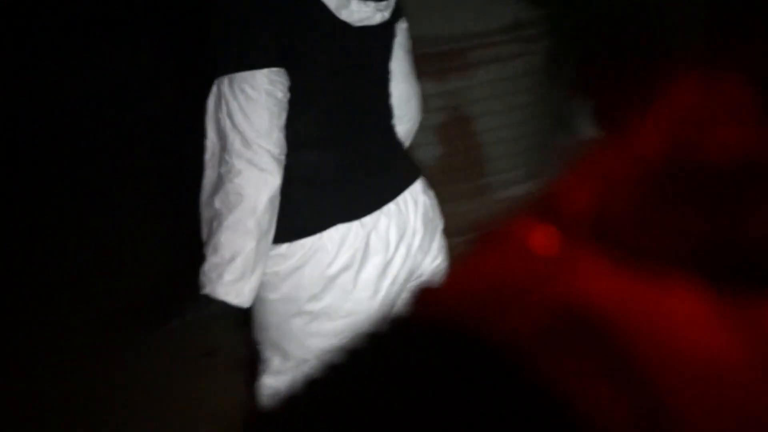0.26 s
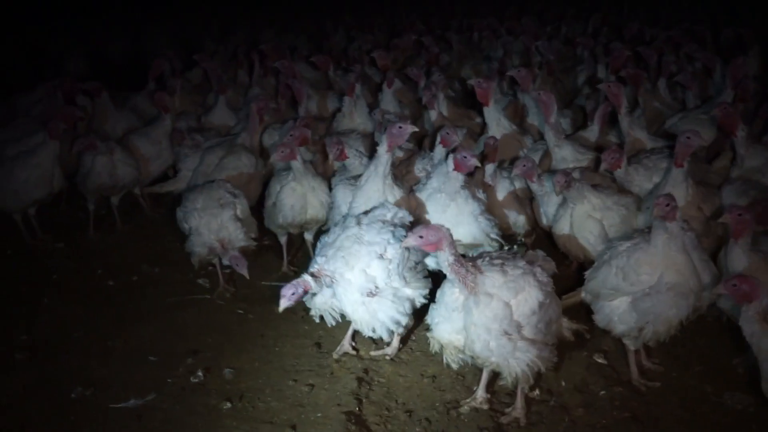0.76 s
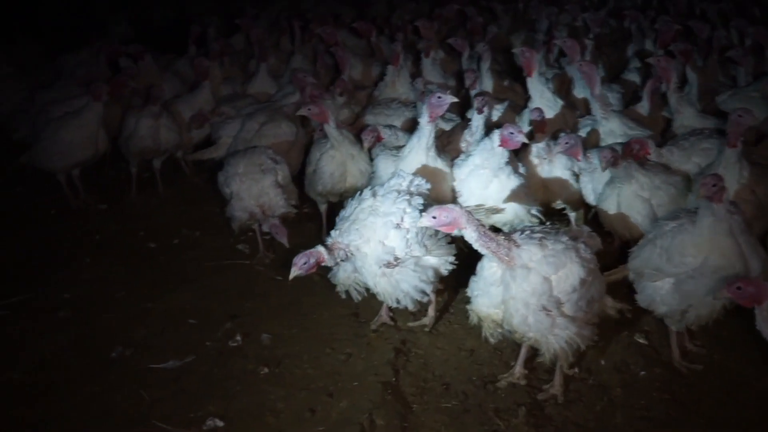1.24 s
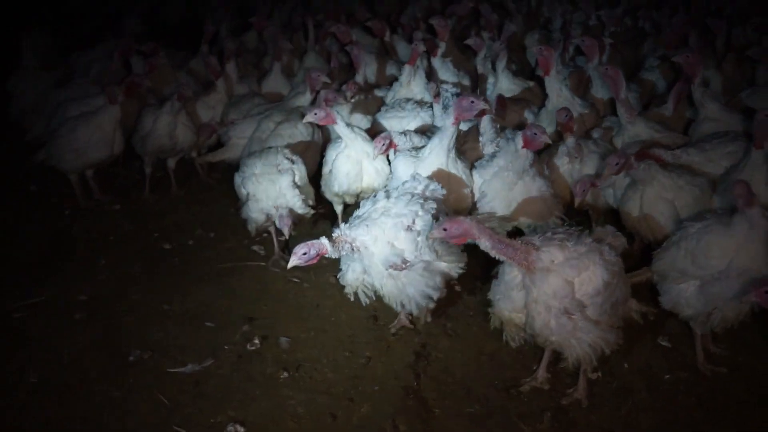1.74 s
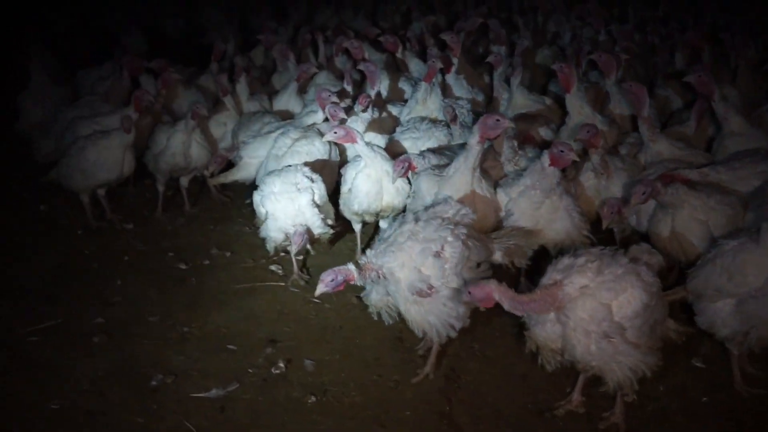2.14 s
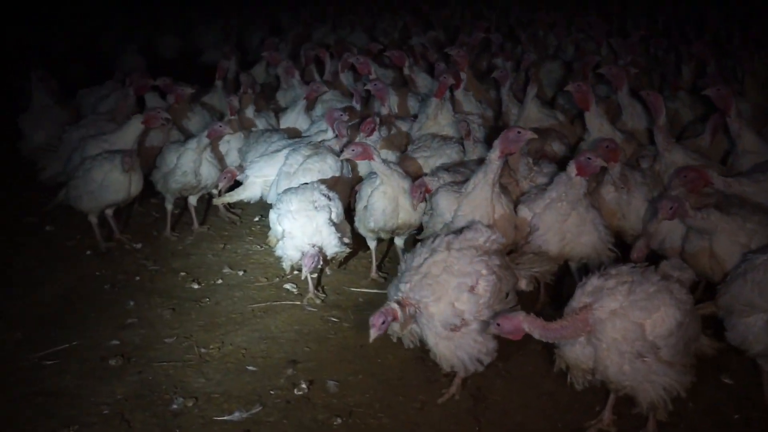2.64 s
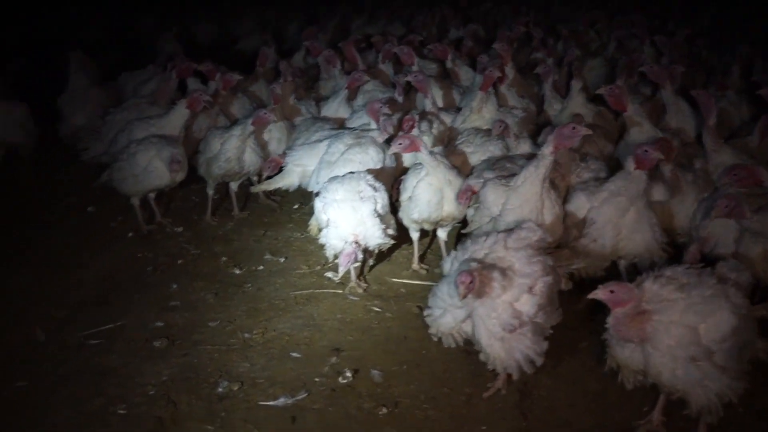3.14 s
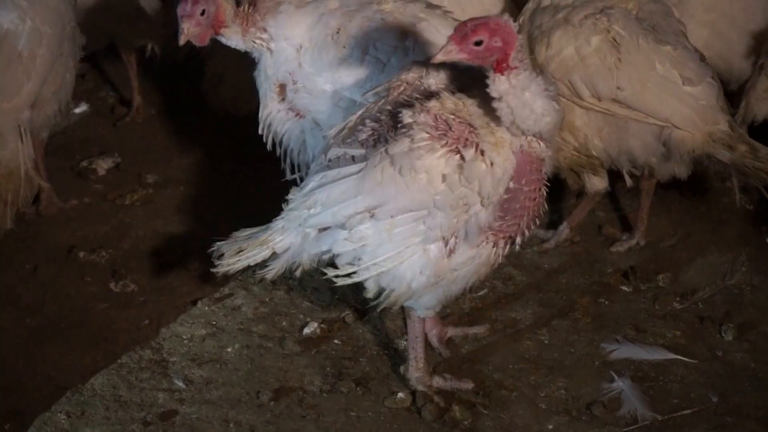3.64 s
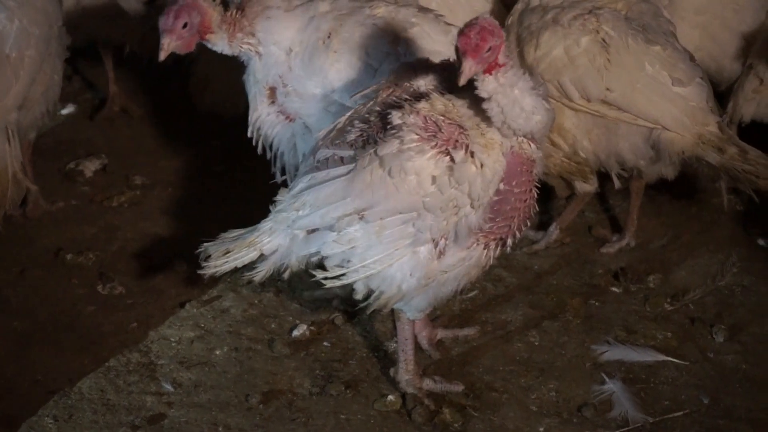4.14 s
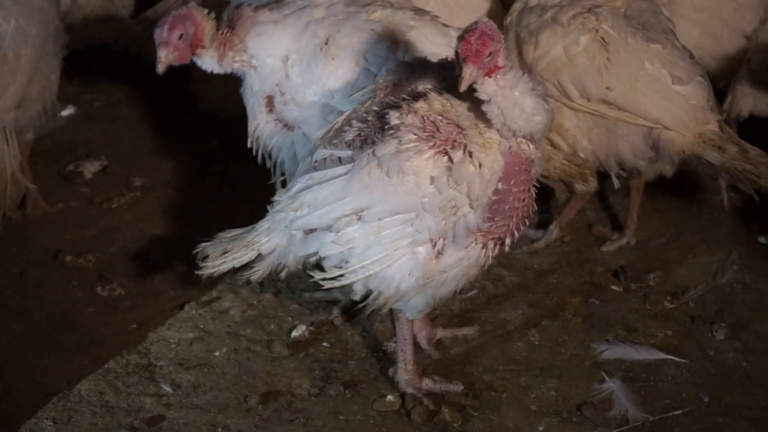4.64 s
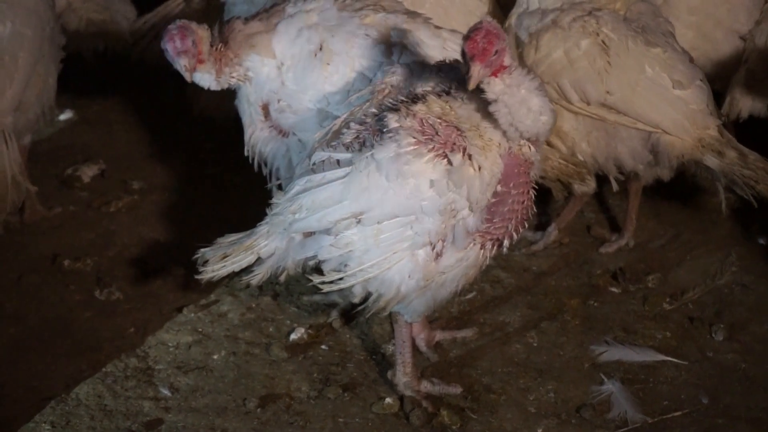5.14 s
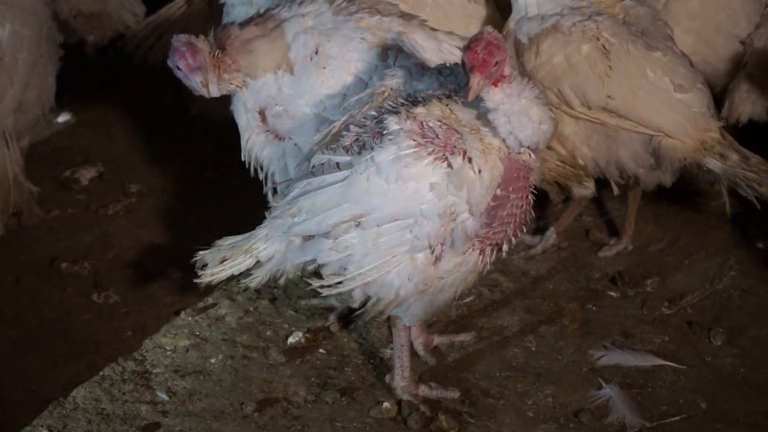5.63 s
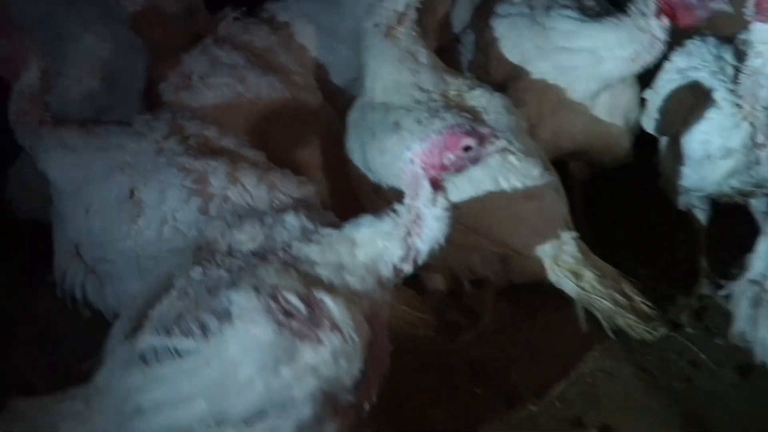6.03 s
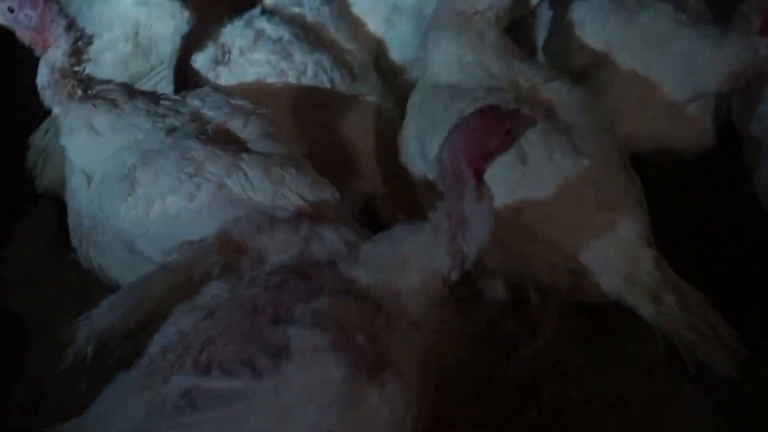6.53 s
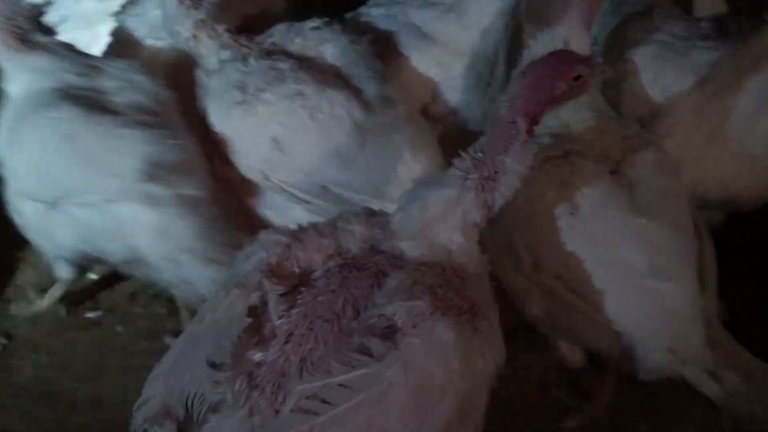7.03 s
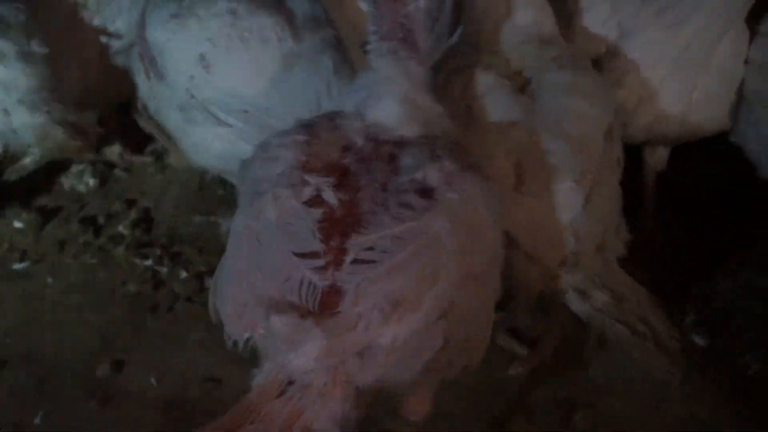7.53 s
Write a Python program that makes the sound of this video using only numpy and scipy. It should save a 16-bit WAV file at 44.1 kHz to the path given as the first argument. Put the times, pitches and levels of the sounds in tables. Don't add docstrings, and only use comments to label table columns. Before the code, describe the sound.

Cloth rubs quietly against a handheld microphone outdoors, with one sharp, dull knock. Half a second in, it cuts abruptly to a large ringing barn packed with turkeys. Close birds give very short, hoarse rising putts and yelps on both sides, mostly right, over a blurred distant chorus. Feathers and litter rustle, claws tick, and a low fan hum sinks under loud calls. The flock surges and thins without stopping.

```python
import sys
import numpy as np
from scipy import signal
from scipy.fft import rfft, irfft, next_fast_len
from scipy.io import wavfile
from scipy.ndimage import uniform_filter1d

SR = 44100
rng = np.random.default_rng(int(sys.argv[2]) if len(sys.argv) > 2 else 0)


def makeup_ratio(level_db):
    decades = np.asarray(level_db, float) / 20
    return 10 ** decades


def log_audio(samples):
    frames = np.atleast_2d(samples).T
    limited = np.clip(frames, -1, 1)
    pcm = np.round(limited * 32767).astype(np.int16)
    wavfile.write(sys.argv[1], SR, pcm)


N = 343098
CUT_S = 0.5
EDGE_HZ = 15850


# centre in Hz, width in Hz, lift or dip in dB.
THROAT = [(3557, 390, 12.5), (4430, 2060, -9), (5740, 560, 14.5), (8300, 240, -1)]


def call(start_hz, end_hz, length, dull_db, flick, rough, mouth=()):
    t = np.arange(0, length, 1 / SR)
    closing = flick * np.exp(-max(dull_db, 0) / 9) * np.exp((t - length) / 0.003)
    hz = start_hz * (end_hz / start_hz) ** (t / length) * (1 + closing)
    breath = rng.standard_normal((2, max(2800, len(t))))
    slow_breath = uniform_filter1d(uniform_filter1d(breath, size=40), size=30)
    wobble, rasp = 1.2 * slow_breath[:, :len(t)]
    turns = np.cumsum(hz * (1 + rough * wobble)) / SR

    k = np.arange(1, 11)[:, None]
    resonances = THROAT + list(mouth)
    lift_db = sum(db / (1 + (2 * (k * hz - f) / width) ** 2) for f, width, db in resonances)
    level = makeup_ratio(-dull_db * np.log2(k) - 3.58 * (k - 1.5) + lift_db) * (k * hz < EDGE_HZ)
    level *= np.minimum(t / (0.0025 + 0.0002 * k ** 2), 1) ** 1.5
    level *= 1 + 13 * rough * np.sqrt(k - 0.9) * rasp
    voice = (level * np.sin(2 * np.pi * k * turns)).sum(0)
    snap = 0.08 * closing * breath[1, :len(t)]
    return (voice + snap) * np.minimum((length - t) / 0.00044, 1)


def add(mix, s, sound, pan_db):
    part = mix[:, round(s * SR):][:, :len(sound)]
    part += makeup_ratio(np.array([[0.5], [-0.5]]) * pan_db) * sound[:part.shape[1]]


# start in seconds, peak in dB,
# start pitch in Hz, end pitch in Hz, dullness in dB per octave.
GLIDES = [(0.61, -18, 791, 987, 7.5), (0.832, -13.5, 858, 1260, 17), (4.47, -18.5, 1420, 1300, 11),
          (.555, -24.5, 1106, 1470, 14), (1.149, -19, 1498, 1896, 19), (1.078, -13, 1340, 1584, 12),
          (3.183, -17, 1358, 1753, 13.5), (1.108, -19, 1330, 1300, 18), (2.468, -19, 1183, 1425, 12),
          (2.622, -17, 978, 1170, 9), (7.385, -15.5, 1007, 1350, 7.5), (7.653, -24, 1244, 1530, 17),
          (7.527, -21.5, 1526, 1930, 14), (1.588, -19.5, 757, 793, 3.5), (1.136, -15, 1118, 1300, 12),
          (1.454, -15, 978, 847, 13), (1.585, -15, 886, 1288, 11), (1.921, -14.5, 1005, 1440, 14),
          (2.138, -13.5, 960, 1376, 11.5), (2.531, -20.5, 952, 686, 8), (3.078, -18.5, 1069, 1210, 8),
          (3.094, -17.5, 1500, 2064, 18), (3.159, -15.5, 1156, 1710, 8.5), (3.328, -18.5, 920, 1404, 7.5),
          (3.967, -26, 825, 1000, 24), (4.02, -14.5, 1027, 1370, 16), (4.141, -17, 792, 701, 2.5),
          (4.438, -13, 1108, 1310, 4), (5.063, -20.5, 802, 1784, 9.5), (6.076, -13.5, 1030, 1300, 10),
          (6.737, -13, 878, 1100, 8.5), (7.04, -13.5, 1144, 1525, 28.5), (7.063, -15.5, 867, 1140, 4.5),
          (7.103, -22.5, 738, 953, 0.5), (7.319, -21.5, 915, 1170, 5.5)]
# start in seconds, peak in dB, start pitch in Hz,
# dullness in dB per octave.
PUTTS_RIGHT = [(0.691, -22, 1206, 5), (0.876, -20.5, 990, 6), (1.502, -12.5, 950, 9.5),
               (1.75, -18, 1066, 9), (2.59, -21, 946, 13), (3.743, -18, 948, 9.5), (4.511, -20.5, 837, 10),
               (4.814, -24.5, 1043, 6), (5.811, -11.5, 902, 13), (5.966, -19, 1300, 11),
               (6.17, -16, 952, 2.5), (6.194, -14, 1356, 16), (6.704, -11, 1077, 12),
               (6.787, -16, 1452, 16), (7.52, -16, 1075, 6.5), (7.6, -18.5, 988, 27), (7.721, -16, 1188, 6)]
# start in seconds, peak in dB, start pitch in Hz, dullness in dB per octave.
PUTTS_LEFT = [(0.503, -16.5, 883, 20), (0.55, -18.5, 996, 20), (0.973, -21, 970, 9.8),
              (1.003, -17, 1270, 8.8), (0.922, -20.5, 1248, 7.4), (1.19, -19, 940, 5.8),
              (2.826, -25, 950, 7.3), (2.007, -17, 1112, 11), (2.018, -21, 805, 1.9),
              (2.199, -19, 1668, 25), (2.274, -15, 893, 5.5), (2.47, -20, 672, 3.5),
              (2.48, -15.5, 1218, 10.5), (2.805, -15.5, 859, 7.7), (2.875, -14.5, 894, 11),
              (2.967, -22, 843, 19), (4.656, -21.5, 880, 23), (5.08, -17, 872, 7.3),
              (5.296, -24.5, 765, 33), (1.979, -19, 1160, 7.1), (2.298, -23, 982, 8.4),
              (7.2, -25.5, 1416, 6.1)]
PAN_DB = {"glides": -7.5, "putts right": -9.5, "putts left": 6.5, "yelps right": -3.5, "yelps left": 8,
          "gobbles": -5}


def putts():
    rise, fade_db = 1.064, 1
    out = np.zeros((2, N))
    rows = [(*row, PAN_DB["glides"]) for row in GLIDES]
    for table, place in (PUTTS_RIGHT, "putts right"), (PUTTS_LEFT, "putts left"):
        rows += [(s, db, hz, rise * hz, dull_db, PAN_DB[place]) for s, db, hz, dull_db in table]
    for s, db, start_hz, end_hz, dull_db, pan_db in rows:
        glide = abs(np.log(end_hz / start_hz))
        putt = call(start_hz, end_hz, 0.015 + 0.024 * glide, dull_db, flick=0.25, rough=0.1 + 0.2 * glide)
        level = makeup_ratio(db - 1.0 - np.linspace(0, fade_db, len(putt)))
        add(out, s - 0.003, level * putt * signal.windows.tukey(len(putt), 0.3), pan_db)
    return out


# start in seconds, peak in dB, pitch in Hz, length in seconds,
# dullness in dB per octave.
YELPS_RIGHT = [(0.505, -17, 600, 0.038, 15), (1.758, -11, 1153, 0.036, 23), (2.318, -15, 1353, 0.024, 11),
               (2.636, -5, 1339, 0.025, 5.5), (2.708, -13, 1334, 0.035, 4.5),
               (3.581, -16.5, 1024, 0.027, 35), (3.845, -18.5, 563, 0.037, 21), (4.57, -19, 859, 0.034, 23),
               (5.731, -31, 964, 0.051, 10), (5.887, -12, 879, 0.032, 18), (5.934, -11.5, 957, 0.037, 27),
               (6.009, -14.5, 1023, 0.027, 28), (6.311, -14, 1250, 0.022, -1),
               (6.383, -16, 1462, 0.024, 12), (6.948, -27, 1523, 0.02, 20), (6.612, -16.5, 921, 0.041, 14),
               (6.66, -15, 860, 0.036, 18), (7.1, -10.5, 1353, 0.036, 20), (6.866, -20, 1556, 0.035, 17),
               (7.356, -7.5, 972, 0.04, 8), (7.68, -13, 1223, 0.022, 2)]
# start in seconds, peak in dB, pitch in Hz, length in seconds,
# dullness in dB per octave.
YELPS_LEFT = [(0.71, -24, 526, 0.11, 20), (0.716, -21, 1300, 0.04, 2.5), (1.323, -15, 929, 0.061, 20),
              (1.64, -22, 904, 0.059, -0.5), (2.088, -23, 626, 0.021, -3.5), (3, -14.5, 870, 0.023, 20),
              (3.2, -17, 1650, 0.028, 16), (3.345, -10, 1324, 0.023, 19), (3.36, -10, 1427, 0.031, 8.5),
              (4.73, -15.5, 790, 0.01, 24), (5.368, -25, 800, 0.019, 24), (5.446, -28.5, 937, 0.081, 6),
              (6.223, -18.5, 1458, 0.077, 10), (6.287, -9, 1416, 0.03, 11), (3.93, -21, 534, 0.059, 20),
              (0.65, -22, 539, 0.042, 20), (7.161, -10, 1437, 0.02, 25), (7.449, -24, 907, 0.047, 1)]


def yelps():
    out = np.zeros((2, N))
    for rows, place in (YELPS_RIGHT, "yelps right"), (YELPS_LEFT, "yelps left"):
        for s, db, hz, length, dull_db in rows:
            rough = 0.11 + 0.1 * (hz > 1200)
            yelp = call(0.96 * hz, 1.03 * hz, length, dull_db + 3, flick=0.1, rough=rough)
            add(out, s - 0.005, makeup_ratio(db - 6.5) * yelp * signal.windows.tukey(len(yelp), 0.6), PAN_DB[place])
    return out


# start in seconds, peak in dB, start pitch in Hz, end pitch in Hz,
# length in seconds.
PEEPS = [
    (1.088, -25, 1320, 1300, .014),
    (2.186, -28, 1175, 1165, .011),
    (2.853, -29, 1025, 955, .036),
    (5.705, -17, 800, 1040, .085),
    (6.505, -27, 810, 830, .035),
    (6.56, -31, 830, 850, .04),
    (6.812, -30, 1520, 1545, .045),
    (6.885, -19, 1540, 1550, .04),
    (6.797, -21, 1600, 3600, .018),
]


def peeps():
    out = np.zeros((2, N))
    for s, db, start_hz, end_hz, length in PEEPS:
        dull_db = 16 * (end_hz > start_hz)
        add(out, s, makeup_ratio(db) * call(start_hz, end_hz, length, dull_db, flick=0, rough=0.04), 0)
    return out


# start in seconds, peak in dB, pitch in Hz,
# length in seconds, lifted overtone number.
GOBBLE = [(4.944, -47, 878, 0.013, 2.05), (5.909, -43, 940, 0.012, 2.05), (2.628, -50, 893, 0.036, 3.1),
          (4.142, -44, 746, 0.015, 3), (5.906, -37, 630, 0.011, 3.9), (5.96, -31.5, 658, 0.018, 3),
          (6.02, -28, 689, 0.017, 3), (6.072, -27, 623, 0.021, 3.2), (6.114, -28, 715, 0.018, 3),
          (6.147, -29, 604, 0.022, 3), (6.303, -35, 657.4, 0.038, 2.05)]


def gobbles():
    out = np.zeros((2, N))
    for s, db, hz, length, overtone in GOBBLE:
        mouth = [(overtone * hz, 700, 24)]
        pulse = call(0.97 * hz, 1.04 * hz, length, 4, flick=0, rough=0.09, mouth=mouth)
        add(out, s - 0.003, makeup_ratio(db) * pulse * signal.windows.tukey(len(pulse), 0.4), PAN_DB["gobbles"])
    return out


# start in seconds, peak in dB, start pitch in Hz,
# end pitch in Hz, length in seconds.
NOTES = [(1.31, -6.5, 900, 930, 0.069), (3.088, -4.5, 1300, 1480, 0.021), (3.12, -19, 1440, 1460, 0.028),
         (3.206, -13, 1600, 1740, 0.022), (3.38, -7, 1500, 1650, 0.032), (3.42, -14, 1700, 1440, 0.047),
         (3.47, -20, 1430, 1520, 0.052), (4.036, -7.5, 1370, 1320, .018), (4.056, -11, 1320, 1430, 0.0098),
         (4.077, -19, 1310, 1270, 0.01), (4.108, -13, 1220, 1370, 0.03), (4.139, -6.5, 2350, 2080, 0.019),
         (4.14, -11.5, 1800, 1390, 0.027), (4.165, -16, 1500, 1480, 0.044), (4.142, -18.5, 782, 726, 0.025),
         (3.4, -6.5, 1540, 1580, 0.011), (0.74, -6, 860, 960, 0.012), (1.005, -16, 1300, 1330, 0.021),
         (6.03, -15, 904, 930, 0.016), (5.365, -17, 780, 850, 0.017), (2.194, -4.5, 1640, 1780, 0.012),
         (1.2, -18.5, 720, 760, 0.052), (1.25, -14.5, 1100, 1000, 0.048), (6.1, -16.5, 720, 790, 0.058),
         (6.28, -16, 640, 690, 0.059), (6.36, -20.5, 2300, 2280, 0.036), (1.6, -16.5, 1860, 1840, 0.052),
         (1.675, -17, 1850, 1860, 0.03), (4.772, -17.5, 800, 1070, 0.023), (4.845, -20.5, 790, 770, 0.033),
         (4.88, -18, 820, 820, 0.027), (4.835, -20.5, 1250, 1060, 0.051), (5.095, -20, 1800, 1680, 0.033),
         (5.835, -10, 840, 710, 0.036), (5.99, -12.5, 790, 800, 0.031), (0.725, -17, 1360, 1327, 0.045),
         (1.69, -24, 610, 660, 0.044), (6.815, -14, 1640, 1500, 0.033), (6.858, -8, 1550, 1600, 0.022)]
# start in seconds, peak in dB, start pitch in Hz, end pitch in Hz,
# length in seconds.
SHRIEKS = [
    (2.183, -10, 1170, 1165, 0.015),
    (1.086, -13, 1320, 1300, 0.015),
    (6.795, -15, 1620, 1660, .014),
    (6.296, -17, 1250, 1290, .02),
]


def notes():
    out = np.zeros((2, N))
    for rows, dull_db in (NOTES, 16.5), (SHRIEKS, 0):
        for s, db, start_hz, end_hz, length in rows:
            note = call(start_hz, end_hz, length, dull_db, flick=0, rough=0.05)
            add(out, s, makeup_ratio(db - 7.0) * note * np.hanning(len(note)) ** 0.51, -1)
    return out + makeup_ratio(-9) * barn(out, count=2)


def curve(rows, axis):
    rows = np.array(rows)
    return np.interp(np.arange(N) / SR, rows[:, 0], rows[:, axis])


# time in seconds, high-voiced group in dB, low-voiced group in dB,
# shrill young group in dB.
FLOCK = [(0.5, -25.5, -27.5, -35), (0.7, -21.5, -25.5, -29), (1.33, -22, -30, -27.5),
         (1.86, -28, -23.5, -28.5), (2.26, -28, -38.5, -29.5), (2.62, -21, -28, -28),
         (3.7, -28.5, -30.5, -38), (3.99, -27.5, -25.5, -38), (4.41, -36.5, -62, -39.5),
         (4.66, -26, -32, -33), (5.59, -36, -44, -47), (5.75, -43, -29.5, -46), (5.89, -19, -24, -30),
         (6.04, -20, -24, -26.5), (6.24, -36, -42, -33), (6.54, -35, -55, -36.5), (6.89, -30.5, -31.5, -34),
         (7.78, -21.5, -33.5, -25.5)]


def far_birds(axis, low_hz, high_hz, count):
    out = np.zeros((2, N))
    first_s = CUT_S - 0.2
    for place, tone, glide, size, long in rng.random((count, 5)):
        hz = low_hz * (high_hz / low_hz) ** tone ** 1.5
        end_hz = hz * (1 + 0.2896 * glide ** 2)
        voice = call(hz, end_hz, 0.0148 + 0.035 * long, 12, flick=0.3, rough=0.16)
        add(out, first_s + place * (N / SR - first_s), makeup_ratio(10 * size) * voice, 12 * glide - 8)
    out = barn(out, count=1) + 0.7 * out
    mean_db = 10 * np.log10(uniform_filter1d((out ** 2).mean(0), size=9000) + 1e-9)
    return out * makeup_ratio(curve(FLOCK, axis=axis) - 3.0 - mean_db)


def evened(x):
    return x / np.sqrt(np.mean(x ** 2) + 1e-20)


def read(points, hz):
    f, value = np.transpose(points)
    return np.interp(np.log(hz + 1), np.log(f + 1), value)


# frequency in Hz, left-right likeness from 0 to 1.
SAME = [(60, 0.996), (180, .985), (550, 0.93), (1650, 0.78), (4970, 0.05), (15000, 0.35)]
# frequency in Hz, time to fall 60 dB in seconds.
BARN = [(400, 0.44), (1000, 0.76), (2000, 0.62), (4000, 0.56), (8000, 0.21), (14000, 0.032)]


def barn(x, count):
    out = np.zeros((2, N))
    turn = 2 * np.pi * np.arange(N) / SR / 0.23
    for k in range(count):
        taps = np.zeros((2, SR))
        at = np.arange(500, SR - 20, 20) + rng.integers(0, 20, (2, (SR - 501) // 20))
        np.put_along_axis(taps, at, rng.choice([-1., 1.], at.shape), 1)
        hz, lag, z = signal.stft(taps, SR, nperseg=256)
        same = np.clip(read(SAME, hz) - 0.1, 0, 1)[:, None]
        z[1] = same * z[0] + np.sqrt(1 - same ** 2) * z[1]
        z *= 1 + 0.71 * np.exp(-lag / 0.025)
        z *= makeup_ratio(5 * rng.standard_normal(len(lag)) * np.exp(-lag / 0.21))
        tail = signal.istft(z * makeup_ratio(-60 * lag / read(BARN, hz)[:, None]), SR, nperseg=256)[1]
        tail /= np.linalg.norm(tail[0])
        share = np.sqrt((1 + (count > 1) * np.cos(turn - 2 * np.pi * k / count)) / count)
        out += signal.fftconvolve((x.mean(0) * share)[None], tail, axes=1)[:, :N]
    return out * makeup_ratio([[-1.1], [1.1]])


def noise(spectrum, patchy_db, count=N):
    frames, hz = count // 128 + 5, np.fft.rfftfreq(512, 1 / SR)
    a, b, c, d, patches = rng.standard_normal((frames, 257, 5)).T
    patches = evened(uniform_filter1d(uniform_filter1d(patches, size=10, axis=0), size=16, axis=1))
    same = np.clip(read(SAME, hz), -1, 1)[:, None]
    left = a + 1j * b
    right = same * left + np.sqrt(1 - same ** 2) * (c + 1j * d)
    z = np.array([left, right]) * makeup_ratio(patchy_db * patches)
    z = signal.istft(z, nperseg=512, noverlap=384)[1][:, :count]
    size = next_fast_len(count)
    colour = makeup_ratio(read(spectrum, np.fft.rfftfreq(size, 1 / SR)))
    z = irfft(rfft(z, size) * colour, size)[:, :count]
    return np.pad(evened(z), ((0, 0), (0, N - count)))


def thump(hz, cycles):
    u = np.arange(3000) / SR * hz
    return np.sin(2 * np.pi * u) * np.exp(-u / cycles)


RUSTLE_PAN_DB = -3
# start in seconds, peak in dB, length in seconds.
RUSTLES = [(0.847, -27, 0.011), (0.996, -18, 0.014), (1.095, -33, 0.019), (1.236, -17, 0.022),
           (1.465, -29, .01), (2.463, -28, 0.013), (2.515, -21, 0.023), (2.644, -24, 0.048),
           (2.708, -25, 0.04), (6.089, -21, 0.027), (1.603, -18.5, 0.081), (1.757, -16.5, 0.016),
           (1.924, -16, 0.077), (2.173, -22.5, 0.1), (3.141, -14, 0.024), (3.33, -15.5, 0.055),
           (3.58, -24.5, 0.012), (3.873, -30, 0.072), (4.028, -15, 0.033), (4.145, -16.5, 0.053),
           (4.447, -21, .012), (4.458, -21, 0.056), (4.163, -28, 0.0066), (4.815, -21, 0.065),
           (5.817, -18, 0.023), (6.291, -17.5, 0.077), (6.782, -14, 0.047), (7.078, -13.5, 0.022),
           (7.139, -19.5, 0.075), (7.375, -17.5, 0.041), (7.513, -23.5, 0.042), (7.664, -9.5, 0.033),
           (7.73, -10.5, 0.017)]
# frequency in Hz, level in dB per Hz.
FEATHER = [(1200, -10), (2500, 4), (4300, -1.5), (7200, -0.5), (11000, -15), (15700, -18)]
# start in seconds, peak in dB, pitch in Hz.
STEPS = [(2.177, -26, 136.4), (2.7, -34, 70), (6.74, -36, 80), (6.998, -29, 176), (3.58, -28, 191),
         (4.673, -20, 126), (4.987, -30, 107), (5.099, -26, 119), (5.296, -31, 128)]


def litter():
    puffs, feet = np.zeros((2, N)), np.zeros((2, N))
    for s, db, length in RUSTLES:
        u = np.arange(0, 6, 1 / (SR * max(length, 0.005)))
        add(puffs, s - 0.004, makeup_ratio(db - 9) * np.minimum(u * 2.5, 1) * np.exp(-u), RUSTLE_PAN_DB)
    for s, db, hz in STEPS:
        add(feet, s, makeup_ratio(db) * thump(hz, cycles=0.97), 0)
    return puffs * noise(FEATHER, patchy_db=3.2) + feet


# start in seconds, peak in dB.
TICKS = [(0.8337, -41), (0.9958, -37), (1.0936, -32), (1.4657, -28), (1.6006, -35), (1.7656, -30),
         (1.8194, -31), (1.9267, -21), (2.1477, -30), (2.1881, -28), (2.6386, -31), (2.7154, -34),
         (3.1434, -31), (3.3345, -26), (3.3839, -35), (3.575, -33), (4.0274, -32), (4.1482, -17),
         (4.447, -32), (4.8406, -32), (6.3043, -33), (6.7941, -20), (7.078, -28), (7.522, -36),
         (7.6632, -22), (7.7305, -26)]


def ticks():
    out, t = np.zeros((2, N)), np.arange(1500) / SR
    for s, db in TICKS:
        add(out, s, makeup_ratio(db - 1.5) * np.minimum(t / 0.0006, 1) * np.exp(-t / 0.0043), RUSTLE_PAN_DB)
    bright = signal.butter(3, 10000, "high", fs=SR, output="sos")
    return signal.sosfilt(bright, out * rng.standard_normal((2, N)))


# start in seconds, peak in dB, length
# in seconds.
SHUFFLES = [
    (0.396, -34.5, 0.25),
    (3.54, -47, 0.1),
    (5.25, -46, 0.21),
    (6.876, -35.5, 0.32),
]
# frequency in Hz, level in dB per Hz.
SWISH = [(240, -24), (400, -6.5), (527, -9.5), (674, -6.5), (1320, -4), (1450, -7.5), (10800, -16.5),
         (15700, -21.5)]


def shuffles():
    swells = np.zeros((2, N))
    for s, db, length in SHUFFLES:
        add(swells, s, makeup_ratio(db) * np.hanning(round(length * SR)), -2)
    return swells * noise(SWISH, patchy_db=4)


def excess_db(x, limit_db, recovery_db):
    power_db = 10 * np.log10(abs(uniform_filter1d((x ** 2).mean(0), size=300)) + 1e-12)
    fall = np.arange(N) * recovery_db / SR
    held_db = np.maximum.accumulate(power_db + fall) - fall
    return uniform_filter1d(np.maximum(held_db - limit_db, 0), size=200)


# time in seconds, lift in dB.
STIR = [(0.66, 6), (1.55, 11.5), (1.8, 3), (3.56, 5), (4.01, 10), (4.49, 4), (5.28, 11.5), (6.72, 2),
        (6.93, 5.5), (7.78, -2)]
# time in seconds, level in dB.
FAN = [(0.5, -50.5), (2.6, -46.5), (3.6, -44.5), (5.4, -43), (6.3, -47)]
# frequency in Hz, level in dB per Hz.
RUMBLE = [(15, -62), (25, -2), (60, 1.5), (143, 5), (546, -5.5), (824, 2.5), (950, -38), (3300, -90)]
# frequency in Hz, level in dB per Hz.
HISS = [(900, -47), (1500, -7), (2500, -3.5), (6000, -2.5), (11000, -6.5), (15700, -10.5)]


def air(birds):
    stir_db = curve(STIR, axis=1)
    rumble = makeup_ratio(curve(FAN, axis=1) + 0.81 * stir_db) * noise(RUMBLE, patchy_db=2.5)
    hiss = makeup_ratio(-54.5 + stir_db + [[-1.5], [1.5]]) * noise(HISS, patchy_db=1.5)
    return (rumble + hiss) / makeup_ratio(0.45 * excess_db(birds, limit_db=-22, recovery_db=40.0))


# time in seconds, level in dB.
CLOTH = [(0, -35), (.06, -31.5), (.12, -34), (.2, -35), (.31, -32.5), (.352, -21), (.39, -28.5),
         (.51, -34.5)]
# frequency in Hz, level in dB per Hz.
RUB = [(12, -14), (20, -11), (192, -4), (270, -10), (528, -13), (600, -14), (780, -22), (1320, -120)]
# start in seconds, peak in dB, pitch in Hz.
JOLT = (0.073, -21, 47)
# peak in dB, pitch in Hz.
BUMP = (-0.24, 390)


def camera():
    rub = makeup_ratio(-1.5) * noise(RUB, patchy_db=0.0, count=SR)
    swish = noise(SWISH, patchy_db=-1.1, count=SR)
    out = makeup_ratio(curve(CLOTH, axis=1)) * (rub + swish)
    jolt_s, jolt_db, jolt_hz = JOLT
    add(out, jolt_s, makeup_ratio(jolt_db) * thump(jolt_hz, cycles=1.0), 0)
    bump_db, bump_hz = BUMP
    add(out, 0.352, makeup_ratio(bump_db) * thump(bump_hz, cycles=0.29), 0)
    return out


def scene():
    near, feathers = putts() + yelps() + peeps() + gobbles(), litter()
    scatter = 1 + 0.65 * evened(uniform_filter1d(rng.standard_normal(N), size=70))
    birds = near + makeup_ratio(-7.5) * barn(near * scatter + 0.5 * feathers, count=3)
    birds += far_birds(axis=1, low_hz=714.2, high_hz=1349.7, count=260)
    birds += far_birds(axis=3, low_hz=1300, high_hz=2208, count=90)
    birds += far_birds(axis=2, low_hz=564.7, high_hz=759.3, count=150)
    birds += notes()
    birds = signal.sosfilt(signal.butter(6, 545, "high", fs=SR, output="sos"), birds)
    birds[0] = np.where(np.arange(N) > 5.6 * SR, np.roll(birds[0], 6), birds[0])

    inside = birds + feathers + shuffles() + ticks() + air(birds)
    since = np.arange(N) / SR - CUT_S
    return np.clip(since / 0.0027, 0, 1) * inside + np.clip(1 - since / 0.021, 0, 1) * camera()


def top_cut(x):
    return signal.sosfilt(signal.butter(12, 15830, fs=SR, output="sos"), x)


def record(dry):
    ducked = makeup_ratio(3.5) * dry / makeup_ratio(0.26 * excess_db(dry, limit_db=-6.0, recovery_db=20.0))
    clipped = np.clip(ducked, -0.99, 0.99)
    edge = signal.firwin(511, EDGE_HZ, window=("kaiser", 9), fs=SR)
    return top_cut(signal.oaconvolve(clipped, edge[None], "same"))


dry = scene()
out = record(dry)
log_audio(out)
```